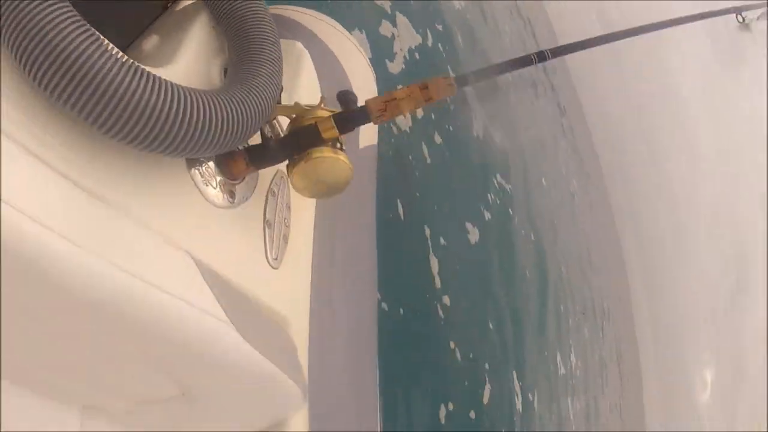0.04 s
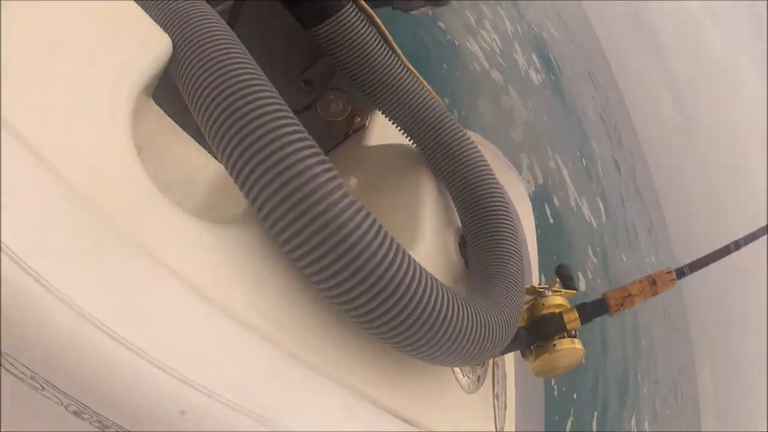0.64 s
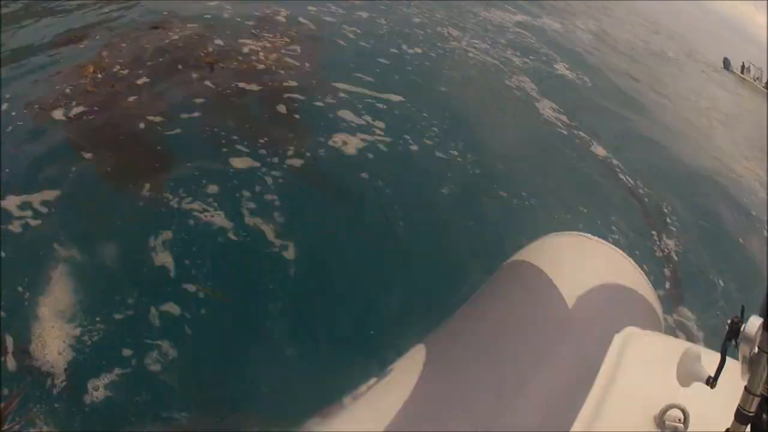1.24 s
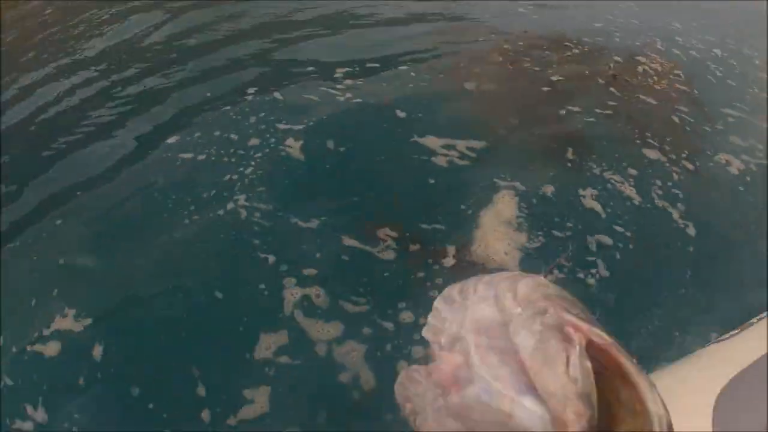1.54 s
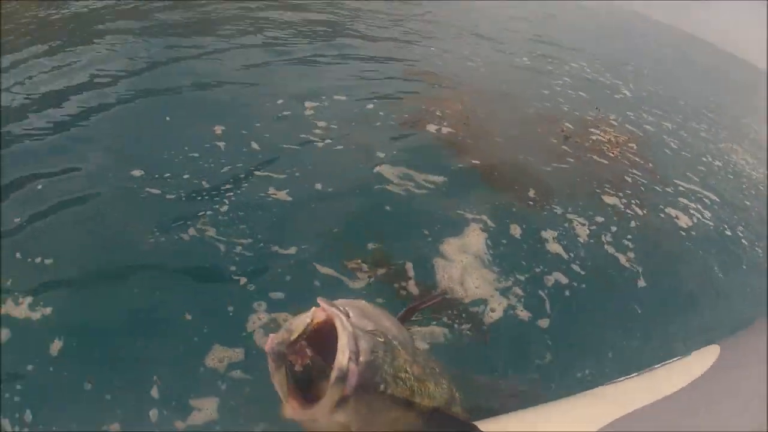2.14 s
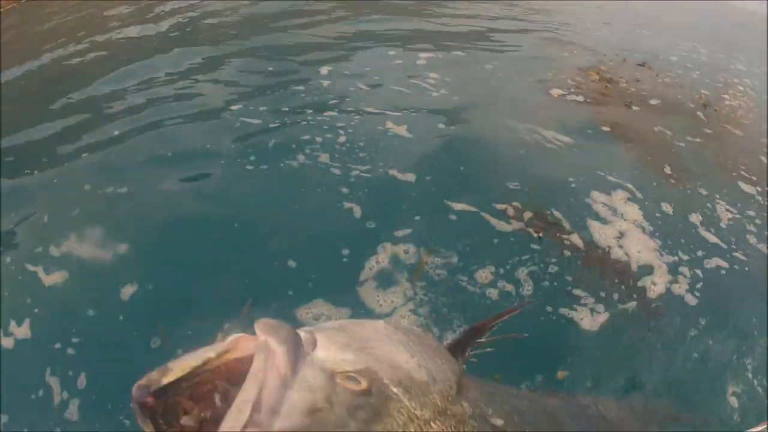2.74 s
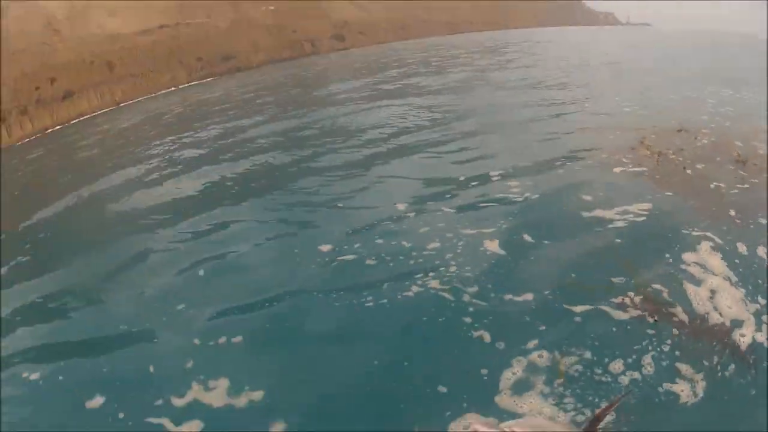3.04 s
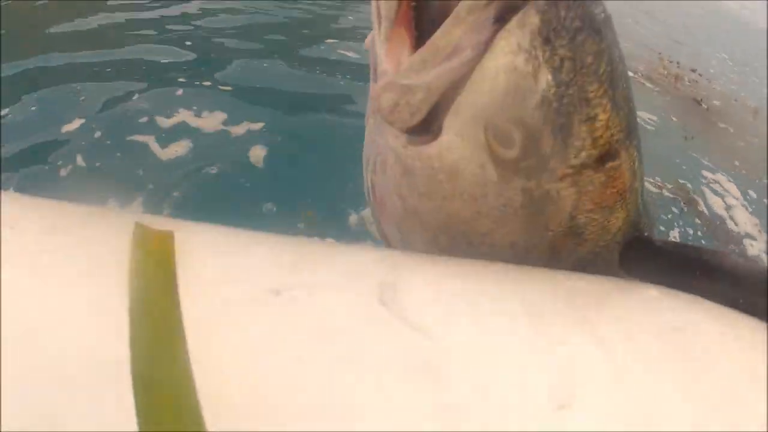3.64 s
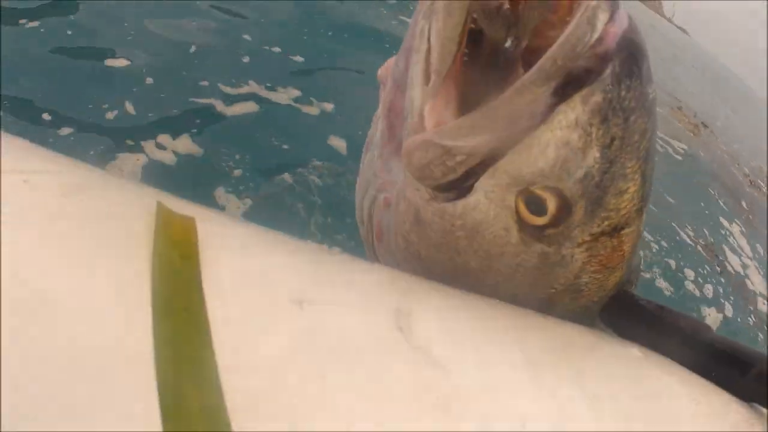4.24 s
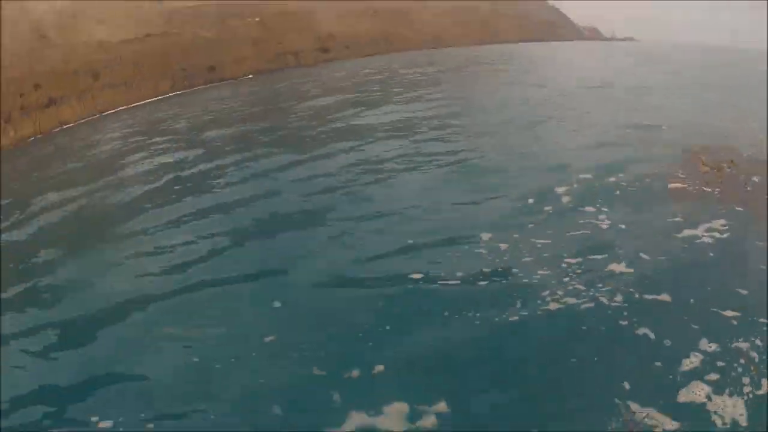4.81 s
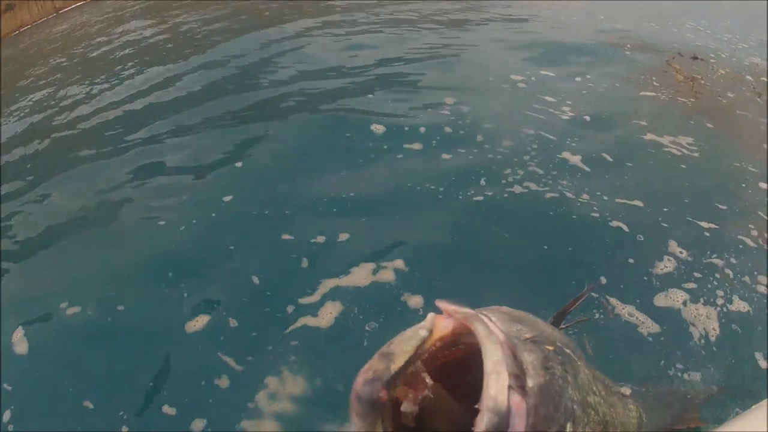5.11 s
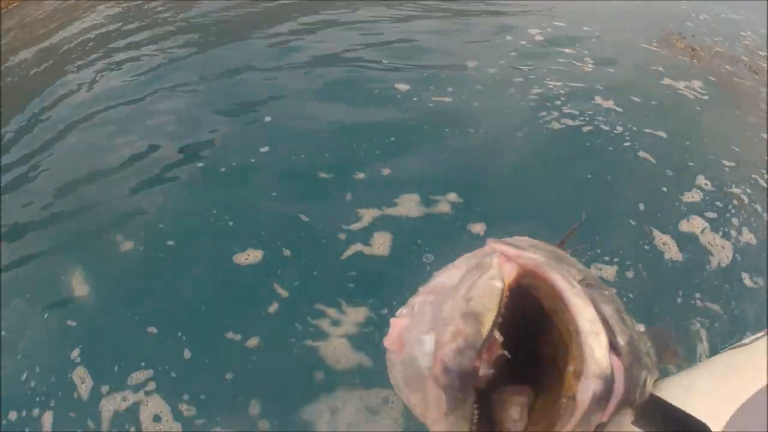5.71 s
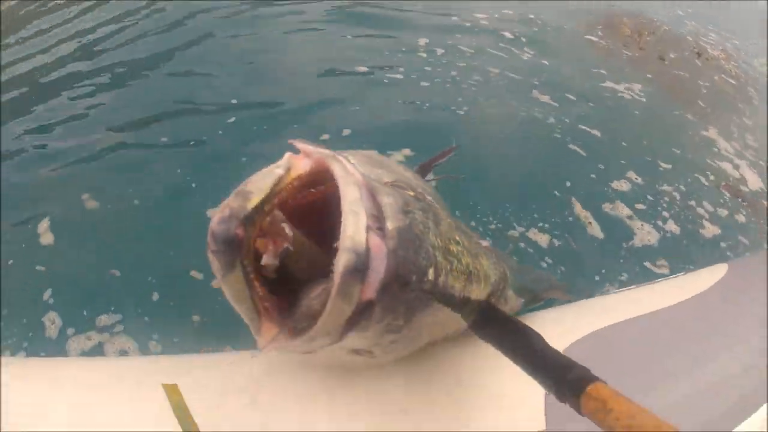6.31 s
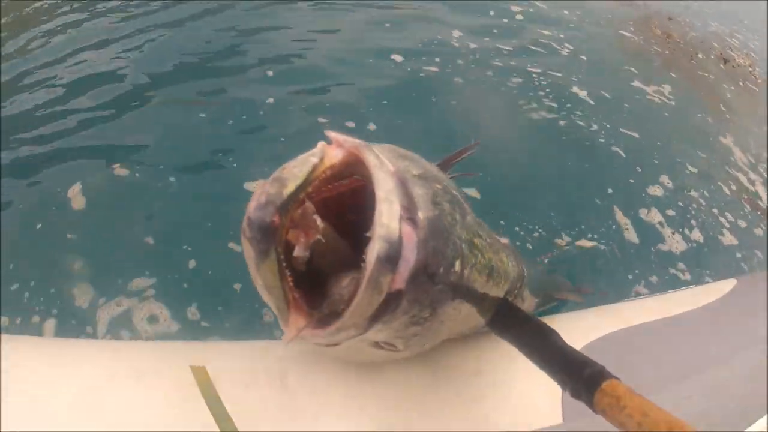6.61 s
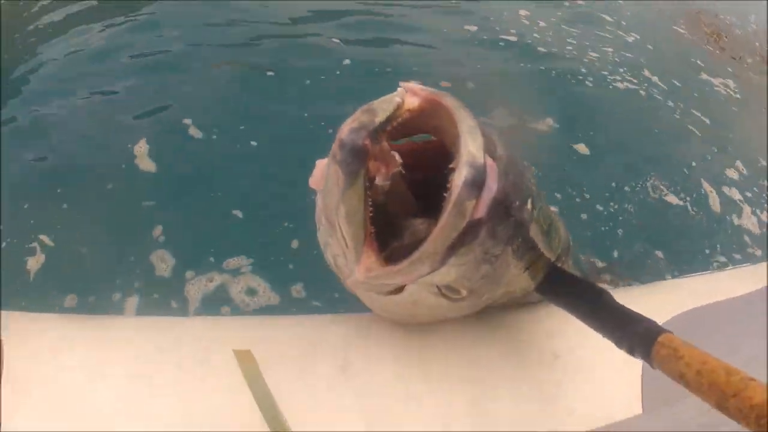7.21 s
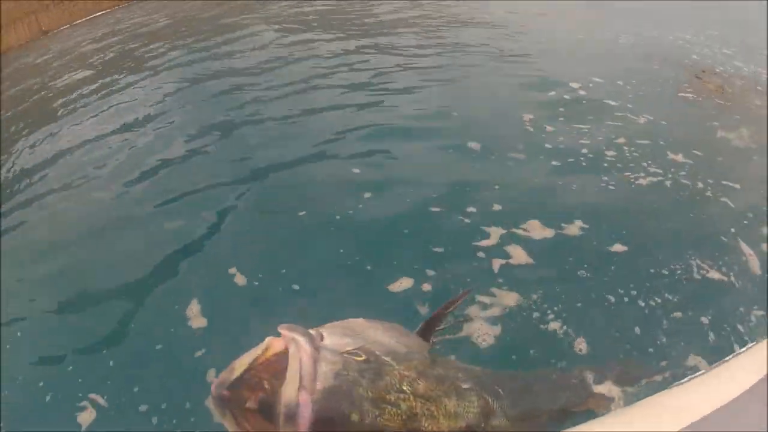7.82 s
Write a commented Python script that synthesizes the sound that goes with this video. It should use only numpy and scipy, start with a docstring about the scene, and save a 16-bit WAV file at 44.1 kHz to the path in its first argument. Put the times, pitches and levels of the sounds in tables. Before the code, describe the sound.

A cluster of loud, hollow knocks hits a small boat's hull, with a low shuddering boom from a jostled camera mount and a few glugs of water. Clothing then rubs in short, raspy strokes against the case around the microphone. More thumps come midway, with small wet drips. After a quieter stretch of faint sea wash, the rubbing returns. Everything sounds very close and boxy.

```python
"""On a plastic kayak at sea, a big fish is hauled against the side, heard from a body-worn camera case.
Blows thump through the hull; the jostled mount booms near 60 Hz and its loose hinge chafes.
Gear and clothing rub on the waterproof case in strokes. Water glugs and drips over a muffled swell.
Sample-and-hold mirrors the sound into the treble, and the hardest blows overload."""
import sys
import numpy as np
from scipy import signal
from scipy.fft import rfft, irfft
from scipy.io import wavfile
from scipy.ndimage import uniform_filter1d

SR = 44100
rng = np.random.default_rng(int(sys.argv[2]) if len(sys.argv) > 2 else 0)


def master(y):
    """Save y as 16-bit WAV."""
    cut = np.clip(np.atleast_2d(y).T, -1, 1)
    pcm = np.round(cut * 32767)  # scale
    wavfile.write(sys.argv[1], SR, pcm.astype(np.int16))


N = 355446
TIME_S = np.arange(N) / SR
FREQS_HZ = np.maximum(np.fft.rfftfreq(8192, 1 / SR), 1)

# Blows on the hull. Each row: start in seconds, thump peak in dB, contact in seconds, rattle in dB,
# rattle decay in seconds.
BLOWS = [(.208, -5.5, .011, -44, 0.029), (.552, -1.5, 0.0049, -19, 0.0068), (.558, -14, 0.0029, -12, .005),
         (.568, -1, 0.0092, -52, .02), (.602, -9.5, 0.0064, -31.5, 0.022), (.711, -8, 0.0075, -15.5, 0.015),
         (.72, -2.5, 0.0067, -24, 0.0033), (.731, 0, 0.0055, -5.5, 0.0062), (.757, -2, 0.0074, -33, 0.041),
         (1.312, -14, .0066, -40, 0.026), (1.347, -8.5, 0.0074, -35.5, 0.055),
         (3.044, -22.5, 0.0015, -35, 0.013), (3.482, -6.5, 0.0053, -18, 0.0047),
         (3.49, -17, 0.0048, -21.5, 0.025), (3.534, 3, 0.0074, -18.5, 0.014),
         (4.385, -11.5, 0.00307, -28.5, 0.015), (4.669, -12.5, 0.0029, -27.5, 0.017),
         (4.94, -9, .0022, -16, 0.011), (5.428, -38.5, 0.0021, -47, 0.03),
         (6.119, -41.5, 0.0018, -46.5, 0.012), (7.668, -30.5, 0.0029, -47, 0.024),
         (7.737, -26.5, 0.0027, -37.5, .012)]
# Hull modes. Each row: frequency in Hz, relative level in dB, T60 in seconds.
HULL_MODES = [(59.35, -11.5, 0.64), (79.5, -2, 0.14), (98.5, 2, 0.083), (137.3, -6.5, 0.12),
              (185.66, -10, 0.37), (226, -10.5, 0.12), (283, -11.5, 0.047), (339, -14.5, .06),
              (409, -10, 0.075), (547, -36.5, 0.93), (810, -22.5, 0.2), (1000, -31.5, .4),
              (1180, -46.5, .5)]
# Jolts of the mount. Each row: peak time and rise in seconds, boom and shudder in dB, boom T60 in seconds.
MOUNT_JOLTS = [ (0.029, 0.12, -14, -19, 0.42), (.22, 0.058, -12.5, -20.5, 0.36),
               (0.289, 0.02, -9, -23.5, 0.22), (.39, 0.039, -5.5, -23, 0.18),
               (.49, 0.048, -14.5, -23, 0.29), (0.584, 0.026, -10.5, -9.5, .3),
               (.635, .015, -17, -17.5, 0.19), (0.759, .04, -7.5, -10.5, 0.64),
               (0.852, 0.018, -13, -23.5, 0.39), (1.0, 0.061, -26.5, -28.5, .3),
               (1.1, .04, -21.5, -28.5, .3), (1.191, 0.027, -24, -44.5, 0.55),
               (1.369, 0.039, -5, -21.5, 0.35), (1.6, 0.032, -25, -35, 0.77),
               (1.76, 0.024, -26, -40.5, 0.48), (1.93, 0.11, -22.5, -33.5, 1),
               (2.39, 0.015, -24, -43.5, 0.35), (2.53, 0.064, -21, -57, 0.78),
               (2.82, .04, -36.5, -44.5, 1.6), (3.14, 0.083, -27, -44.5, 1.6),
               (3.419, 0.033, -26, -40.5, 0.54), (3.57, 0.03, -24.5, -19, 0.45),
               (3.615, 0.02, -12.5, -32.5, 0.72), (3.99, 0.021, -22.5, -39, 0.72),
               (4.19, 0.061, -25.5, -35, 0.18), (4.34, 0.023, -13, -22.5, 0.38),
               (4.429, 0.071, -7, -21, 0.91), (4.96, 0.027, -22, -23.5, 0.55), (5.1, 0.041, -27, -58, 1.33),
               (5.85, 0.076, -37, -41.5, 2), (6.581, 0.12, -44, -46, 0.36), (6.959, 0.054, -45, -59, 1.2),
               (7.42, 0.09, -28, -35.5, 1.64), (7.68, 0.017, -28, -36.5, 0.46),
               (7.76, 0.022, -25.5, -36, .5), (8.03, .05, -28, -32, 0.42)]
# Mount shudder spectrum. Each row: frequency in Hz, relative density in dB.
SHUDDER_SPECTRUM = [(15, -11.5), (28, -2), (42, 7.5), (60, -3.5), (85, -2.5), (125, -8), (155, -8),
                    (186, -1), (225, -13), (320, -27), (450, -18), (800, -59.5), (4000, -94)]
# Hinge chafe spectrum. Each row: frequency in Hz, relative density in dB.
HINGE_SPECTRUM = [(300, -20), (1500, -7.5), (3000, -5), (3800, -6), (4400, -10), (5200, 0), (5800, -9)]
# Fabric strokes on the case. Each row: start, attack and length in seconds, mid-stroke level in dB,
# swell over the stroke in dB, bright part in relative dB, release in seconds.
FABRIC_STROKES = [ (1.24, 0.033, 0.082, -37.5, 5.5, -20, 0.036),
                  (1.403, 0.028, 0.063, -35, -5.5, -10, 0.025),
                  (1.516, 0.031, 0.32, -37.5, 7.5, -8.5, 0.019), (2.179, .003, 0.18, -32.5, -8, -12, .04),
                  (2.342, 0.042, 0.16, -33, 9, -9.5, 0.048), (2.872, 0.026, 0.18, -37, 3, -9, 0.019),
                  (3.676, 0.0082, 0.18, -39, -2, -10, 0.049), (3.812, 0.012, .03, -32.5, -4.5, -11.5, .015),
                  (3.931, 0.0094, 0.059, -38.5, -7, -10, .01),
                  (4.001, 0.0039, 0.032, -35.5, 11, -10, 0.0038), (4.205, 0.024, 0.097, -42, 5.5, -14, .02),
                  (4.313, 0.0074, 0.16, -33, -5, -12, 0.0081),
                  (4.527, 0.0048, 0.063, -32, 3.5, -11.5, 0.012),
                  (4.657, 0.0065, 0.024, -33.5, 0, -11, 0.041), (4.75, 0.016, 0.1, -45, -5, -16, .02),
                  (4.85, .02, 0.11, -32.5, 6, -14, 0.017), (4.955, 0.011, 0.13, -32.5, -5, -12.5, 0.029),
                  (5.253, 0.014, .21, -44.5, 13, -14, 0.017),
                  (5.704, 0.017, 0.14, -34.5, 4.5, -13.5, 0.052),
                  (6.324, 0.029, 0.22, -50.5, -14, -11, 0.025), (7.211, .08, 0.15, -39.5, 6, -7.5, 0.04),
                  (7.372, 0.026, .15, -30, -1, -7.5, 0.0073),
                  (7.658, 0.0066, 0.032, -39.5, 3, -16.5, 0.023),
                  (7.742, 0.036, 0.16, -31.5, 3.5, -9.5, 0.0034),
                  (7.918, 0.0085, 0.067, -31.5, 8, -9, 0.026),
                  (7.973, 0.016, 0.071, -26.5, -2.5, -12.5, 0.036)]
# Case resonances. Each row: frequency in Hz, width in Hz, relative level in dB.
CASE_RESONANCES = [(183.7, 27.7, 8.5), (377, 38, -14.5), (490.3, 42.4, 2), (551.3, 48, 1.5),
                   (677, 107, -3.5), (839.4, 70, -5), (961, 111, -7.5), (1121, 96, -7.5), (1165, 51, -4.5),
                   (1318, 35, -17.5), (1500, 130, -10.5), (1685, 530, -15), (1918, 97, -7),
                   (2134, 220, -11.5), (2439, 130, -14), (2584, 100, -18.5), (2926, 370, -24),
                   (3295, 330, -26.5), (3688, 170, -17), (4013, 470, -25.5), (4630, 310, -34),
                   (5350, 810, -36)]
# Cloth catching. Each row: peak time in seconds, resonance in Hz, level in dB, half length in seconds.
CLOTH_GRIPS = [(1.793, 520, -23.5, 0.018), (1.808, 1893, -46.5, .025), (2.207, 840, -34.5, 0.022),
               (2.265, 547, -35, 0.038), (2.5, 520, -39, 0.024), (2.547, 2000, -39, .032),
               (2.94, 540, -30.5, 0.031), (2.96, 1965, -39.5, 0.035), (3.015, 2085, -38.5, 0.023),
               (3.72, 495, -26.5, 0.031), (3.826, 443, -37, 0.057), (3.984, 1880, -41, 0.036),
               (4.439, 2117, -43.5, 0.043), (4.56, 2000, -38.5, 0.024), (4.93, 1177, -36, 0.052),
               (7.438, 1132, -31.5, 0.043), (7.467, 2040, -37, 0.043), (7.866, 575, -37, .037),
               (8.001, 496, -26, 0.027), (8.024, 1960, -36, 0.072)]
# Light sleeve brushes. Each row: start in seconds, length in seconds, level in dB.
SLEEVE_BRUSHES = [(0, 0.023, -31), (.1, 0.39, -45.5), (0.574, 0.49, -44.5), (1.88, 0.54, -58.5),
                  (3.077, 0.092, -48.5), (3.401, 0.24, -49.5), (4.04, 0.055, -51.5), (6.068, 0.037, -57.5),
                  (7.56, 0.14, -53.5)]
# Glugs under the hull. Each row: time in seconds, starting pitch in Hz, glide in octaves per second,
# level in dB, length in seconds.
WATER_GLUGS = [(0.217, 597, -60, -17, 0.012), (0.439, 458, -11, -18, 0.0086), (0.62, 471, 2, -26, .0205),
               (0.82, 461, -2.5, -26.5, 0.019), (1.058, 907, -67, -28, .014), (1.32, 650, 3, -27, 0.015),
               (1.857, 644, -10, -37.5, 0.0397), (1.891, 746, -16, -39.5, .009),
               (3.204, 527, 1, -37.5, 0.0087), (3.532, 369, -3, -11.5, 0.015),
               (3.569, 350.4, -6, -27, 0.024), (6.202, 934, 1.5, -51, 0.042)]
# Drips and wet smacks. Each row: start in seconds, level in dB, decay in seconds.
WATER_DRIPS = [(1.095, -43.5, 0.0044), (1.35, -44, 0.0095), (1.548, -45, 0.01), (2.041, -56, 0.0029),
               (2.185, -43, 0.013), (2.834, -50.5, 0.013), (3.165, -52, 0.0058), (3.205, -55, 0.0041),
               (3.231, -50, 0.0035), (4.006, -44, 0.004), (4.03, -55, 0.0026), (4.389, -34.5, 0.012),
               (4.416, -41, 0.0074), (4.46, -36, 0.0083), (4.735, -39, 0.0054), (5.706, -34, 0.0088),
               (5.714, -33, 0.014), (6.211, -53.5, 0.03), (6.734, -58, .004)]
# Drip spectrum. Each row: frequency in Hz, relative density in dB.
DRIP_SPECTRUM = [(300, -11.5), (900, -19), (1500, -2), (2100, -1.5), (2900, -16.5), (3800, -14),
                 (5500, -24.5)]
# Sea wash spectrum. Each row: frequency in Hz, relative density in dB.
SEA_SPECTRUM = [(25, -6), (45, -12.5), (62, -4.5), (85, -28), (150, -12), (195, -1.5), (260, -14),
                (370, -20), (500, -24.5), (700, -31), (1050, -28.5), (1170, -25), (1320, -34), (2200, -32),
                (3300, -38), (5800, -44.5)]
# Broad body of the case rattle. Each row: frequency in Hz, relative density in dB.
RATTLE_SPECTRUM = [(100, -8), (280, -1), (400, 6.5), (600, -3.5), (1000, -5.5), (3000, -45), (6000, -48)]


def hull_blows():
    """Each blow drives the hull modes and rattles the case; longer contact gives a duller thump."""
    t = TIME_S[:SR // 2]
    # Neighbouring modes move in opposite directions, so the thud builds instead of snapping.
    ring = sum((-1) ** k * undb(db - 60 * t / t60_s) * np.sin(2 * np.pi * hz * t)
               for k, (hz, db, t60_s) in enumerate(HULL_MODES))
    thumps, shake = np.zeros(N), np.zeros(N)
    rattle_onset = 1 - np.exp(-t / 0.00049)
    for start_s, thump_db, contact_s, rattle_db, decay_s in BLOWS:
        push = t * np.exp(-2 * np.pi * t / contact_s)
        thump = signal.fftconvolve(ring, push)[:len(t)]
        add(thumps, start_s - contact_s, thump / np.abs(thump).max() * undb(thump_db))
        add(shake, start_s, undb(rattle_db) * np.exp(-t / decay_s) * rattle_onset)
    rattle = shake * slips(rate_hz=4600, spread_db=1.0)
    return thumps + through(rattle, case_gain() + colour(RATTLE_SPECTRUM))


def mount_boom(drag, boom_hz=59.9, waver_hz=8.19, hinge_play_db=-22, hinge_limit_db=-33):
    """The mount booms, its pitch wavering with the shudder; on big swings its hinge chafes once a cycle."""
    boom, shudder = mount_envelopes(drag)
    unrest = np.clip(undb(10) * shudder / (boom + shudder / 20), .15, 1)
    cycles = np.cumsum(boom_hz + waver_hz * unrest * walk(25)) / SR
    tone = np.sqrt(2) * np.sin(2 * np.pi * cycles)
    rumble = through(rng.standard_normal(N), colour(SHUDDER_SPECTRUM))
    swing = np.clip(shudder - undb(hinge_play_db), 0, undb(hinge_limit_db))
    chafe = np.exp(-(cycles % 1) / 0.11) * swing * rng.standard_normal(N)
    return boom * tone + shudder * rumble + undb(-6.5) * through(chafe, colour(HINGE_SPECTRUM))


def mount_envelopes(drag, drag_boom_db=-6, drag_shudder_db=-9, rest_db=-51.5, shudder_t60_s=0.404):
    """Boom and shudder amplitudes: jolts build and ring out; fabric drag feeds both."""
    boom_power = (drag * undb(drag_boom_db)) ** 2
    shudder_power = (drag * undb(drag_shudder_db)) ** 2 + undb(rest_db) ** 2
    for peak_s, rise_s, boom_db, shudder_db, boom_t60_s in MOUNT_JOLTS:
        start_s = max(peak_s - .5, 0)
        age_s = TIME_S[:2 * SR] + start_s - peak_s
        build = np.exp(-(np.minimum(age_s, 0) / rise_s) ** 2)
        fall_s = np.maximum(age_s, 0)
        add(boom_power, start_s, (build * undb(boom_db - 60 * fall_s / boom_t60_s)) ** 2)
        add(shudder_power, start_s, (build * undb(shudder_db - 60 * fall_s / shudder_t60_s)) ** 2)
    return np.sqrt(boom_power), np.sqrt(shudder_power)


def fabric_rubbing(dull, bright, crossover_hz=1450):
    """Fluttering friction rings the case; the bright part drives the upper resonances."""
    friction = slips(rate_hz=7000, spread_db=1.5) * undb(1.44 * walk(35))
    upper = 1 / (1 + (crossover_hz / FREQS_HZ) ** 12)
    low_rub = through(friction * dull, case_gain() * (1 - upper))
    high_rub = through(friction * bright, case_gain() * upper)
    return low_rub + high_rub


def stroke_envelopes():
    """Dull and bright rubbing amplitudes: each stroke swells or fades evenly as it slides."""
    dull_power, bright_power = np.zeros(N), np.zeros(N)
    for start_s, attack_s, length_s, db, swell_db, bright_db, release_s in FABRIC_STROKES:
        progress = np.minimum(TIME_S[:SR] / length_s, 1)
        stroke = press(attack_s, length_s, release_s) * undb(db + swell_db * (progress - .5))
        add(dull_power, start_s, stroke ** 2)
        add(bright_power, start_s, (stroke * undb(bright_db)) ** 2)
    return np.sqrt(dull_power), np.sqrt(bright_power)


def cloth_grips():
    """Catching cloth chatters into one resonance: a hollow rasp."""
    t = TIME_S[:SR // 3]
    bins_hz = np.fft.rfftfreq(len(t), 1 / SR)
    rasps = np.zeros(N)
    for peak_s, hz, db, half_s in CLOTH_GRIPS:
        chatter = rng.standard_normal(len(t))
        width_hz = 50 + .055 * hz
        ring = unit(irfft(rfft(chatter) / (1 + (2 * (bins_hz - hz) / width_hz) ** 2)))
        envelope = np.exp(-((t - t.mean()) / half_s) ** 2)
        add(rasps, peak_s - t.mean(), undb(db) * ring * envelope)
    return rasps


def glugs():
    """Trapped air glugs unevenly under the hull in short gliding tones."""
    t = TIME_S[:SR // 4]
    tones = np.zeros(N)
    for time_s, hz, octaves_per_s, db, length_s in WATER_GLUGS:
        pitch_hz = hz * 2 ** (octaves_per_s * np.minimum(t, length_s))
        swell = (2 * t / length_s) ** 2 * np.exp(2 - 4 * t / length_s)
        add(tones, time_s - length_s / 8, undb(db) * swell * np.sin(2 * np.pi * np.cumsum(pitch_hz) / SR))
    churn = 1 + .45 * walk(350)
    return tones * churn


def drips():
    """Water falls from the fish in drips and wet smacks."""
    envelope = np.zeros(N)
    for start_s, db, decay_s in WATER_DRIPS:
        add(envelope, start_s, undb(db) * np.exp(-TIME_S[:SR // 4] / decay_s))
    return through(envelope * slips(rate_hz=7000, spread_db=1.5), colour(DRIP_SPECTRUM))


def sleeve_rustle(rest_db=-65.5, attack_s=0.0075, release_s=0.049, cutoff_hz=3300):
    """Sleeves brush the case lightly over a faint constant rustle."""
    power = np.full(N, undb(rest_db) ** 2)
    for start_s, length_s, db in SLEEVE_BRUSHES:
        add(power, start_s, (undb(db) * press(attack_s, length_s, release_s)) ** 2)
    lowpass = 1 / (1 + (FREQS_HZ / cutoff_hz) ** 2)
    flutter = undb(1.2 * walk(30))
    return through(slips(rate_hz=2300, spread_db=2.5), case_gain() * lowpass) * flutter * np.sqrt(power)


def sea_wash(level_db=-51):
    """Muffled wash of the swell around the boat."""
    swell = undb(1.5 * walk(6))
    return through(rng.standard_normal(N), colour(SEA_SPECTRUM)) * swell * undb(level_db)


def case_gain():
    """Gain per frequency of the case's steep-sided resonances."""
    return np.sqrt(sum((undb(db) / (1 + (2 * (FREQS_HZ - hz) / width_hz) ** 2)) ** 2
                       for hz, width_hz, db in CASE_RESONANCES))


def slips(rate_hz, spread_db):
    """Dense tiny slips of a rough surface, a few much larger than the rest."""
    happens = rng.random(N) < rate_hz / SR
    size = undb(spread_db * np.minimum(rng.exponential(size=N), 4))
    return unit(happens * size * rng.standard_normal(N))


def press(attack_s, length_s, release_s):
    """Contact envelope: build, hold, die away."""
    t = TIME_S[:SR]
    return np.clip(t / attack_s, 0, 1) * np.exp(-np.clip((t - length_s) / release_s, 0, 20))


def walk(rate_hz):
    """Smooth random wander, rms 1."""
    step = int(SR / rate_hz)
    return unit(uniform_filter1d(np.repeat(rng.standard_normal(N // step + 1), step), step)[:N])


def colour(points):
    """Gain per frequency from (Hz, dB) points."""
    hz, db = np.transpose(points)
    return undb(np.interp(np.log(FREQS_HZ), np.log(hz), db))


def through(x, gain):
    """Minimum-phase filter shaped by gain; white noise keeps its level."""
    cepstrum = irfft(np.log(gain + 1e-6))
    half = len(cepstrum) // 2
    cepstrum[1:half] *= 2
    cepstrum[half + 1:] = 0
    response = irfft(np.exp(rfft(cepstrum)))[:half]
    return signal.fftconvolve(x, response / np.linalg.norm(response))[:N]


def undb(db):
    """Decibels to gain."""
    return 10 ** (np.asarray(db) / 20)


def unit(x):
    """Scale to rms 1."""
    return x / np.sqrt(np.mean(x ** 2))


def add(track, start_s, sound):
    """Mix a sound into a track."""
    i = max(int(start_s * SR), 0)
    track[i:i + len(sound)] += sound[:N - i]


def scene(hiss_db=-72.5):
    """One microphone inside the case hears everything; each channel adds faint hiss."""
    dull, bright = stroke_envelopes()
    cloth = fabric_rubbing(dull, bright) + cloth_grips() + sleeve_rustle()
    inside = cloth + mount_boom(drag=dull) + hull_blows() + glugs() + drips() + sea_wash()
    return inside + undb(hiss_db) * rng.standard_normal((2, N))


def record(dry, hold_hz=12000, cutoff_hz=15300):
    """Low-rate sample-and-hold mirrors the sound into the treble; loud blows overload."""
    coarse = signal.resample_poly(dry, hold_hz, SR, axis=1, window=("kaiser", 5))
    held = signal.resample_poly(np.repeat(coarse, 4, axis=1), SR, 4 * hold_hz, axis=1)[:, :N]
    lowpass = signal.ellip(10, .1, 80, cutoff_hz, fs=SR, output="sos")
    return signal.sosfilt(lowpass, np.clip(held, -1, 1))


dry = scene()
out = record(dry)
master(out)
```